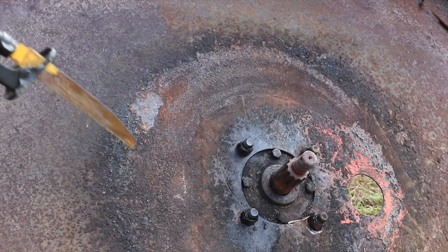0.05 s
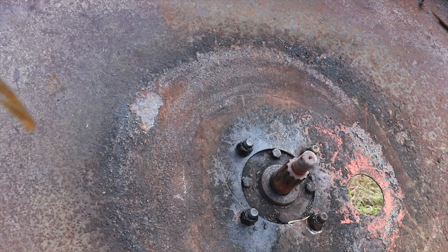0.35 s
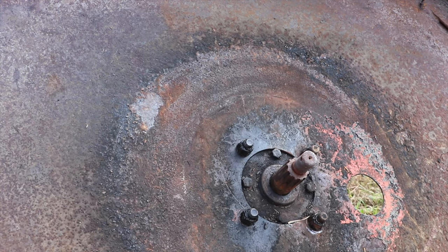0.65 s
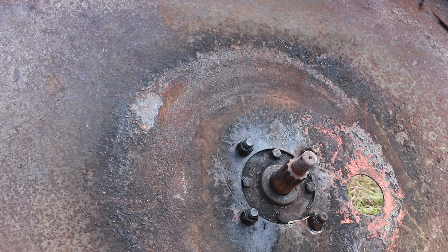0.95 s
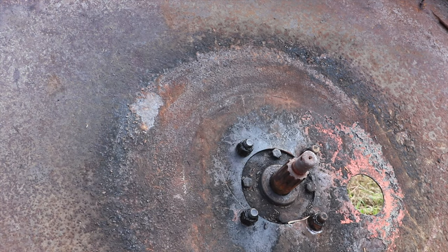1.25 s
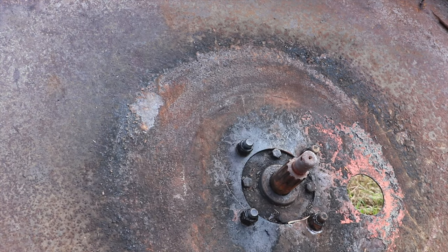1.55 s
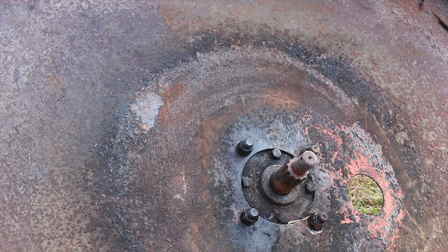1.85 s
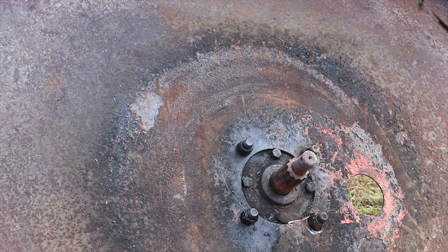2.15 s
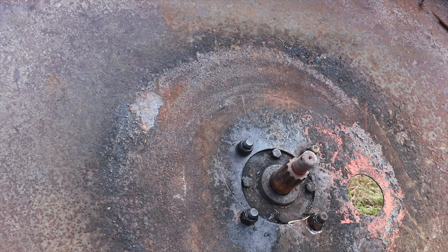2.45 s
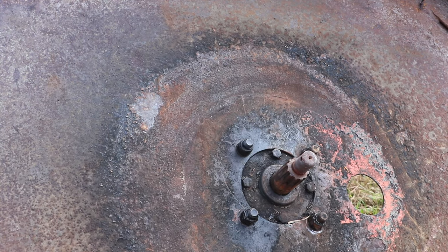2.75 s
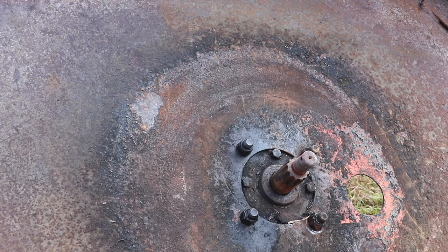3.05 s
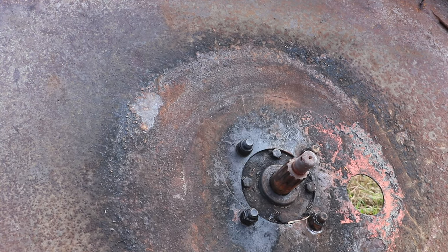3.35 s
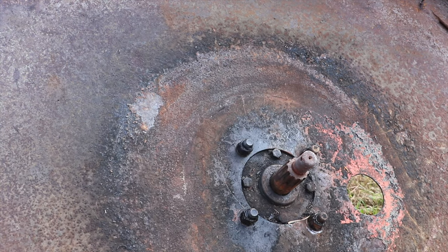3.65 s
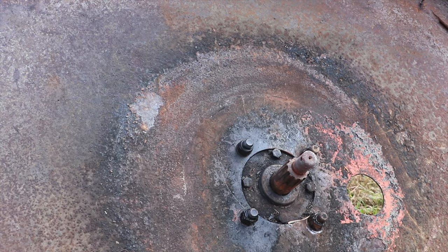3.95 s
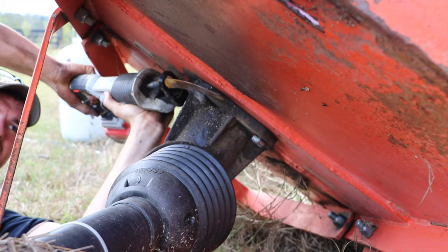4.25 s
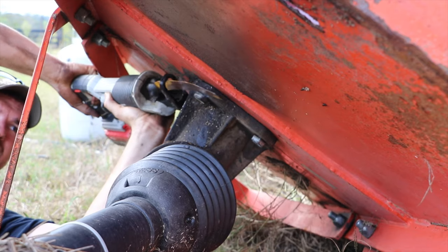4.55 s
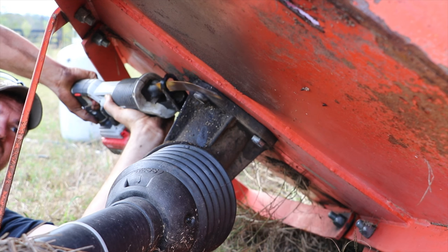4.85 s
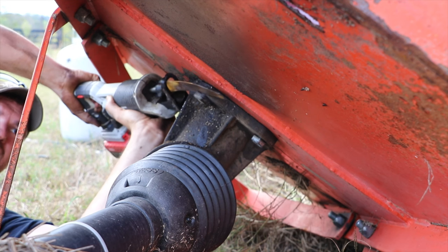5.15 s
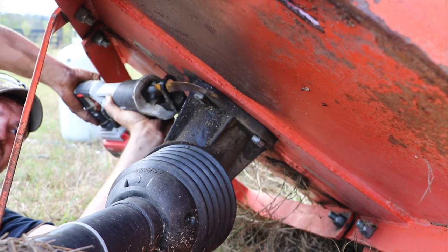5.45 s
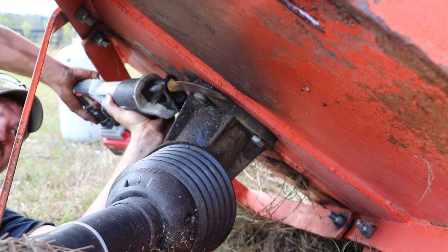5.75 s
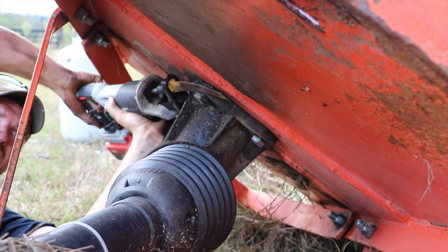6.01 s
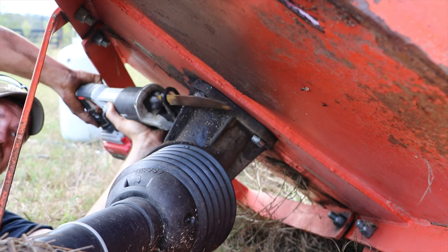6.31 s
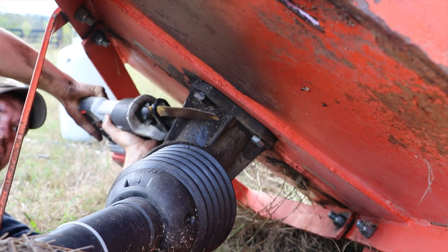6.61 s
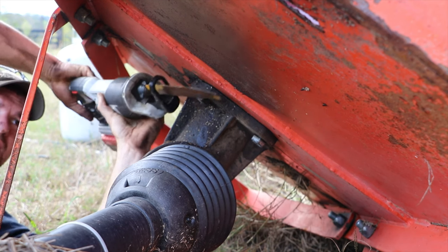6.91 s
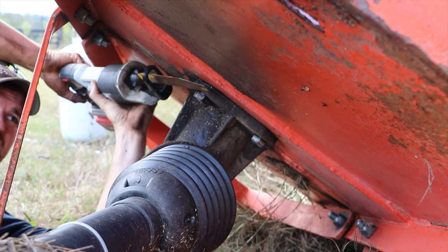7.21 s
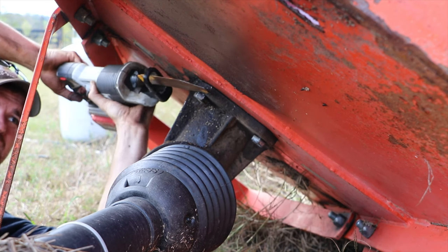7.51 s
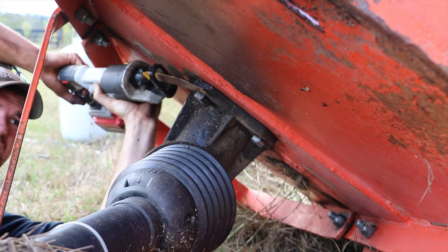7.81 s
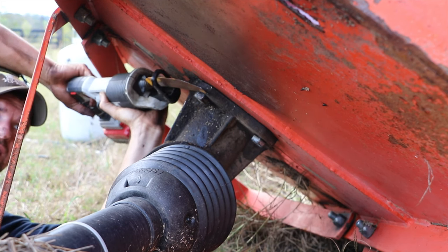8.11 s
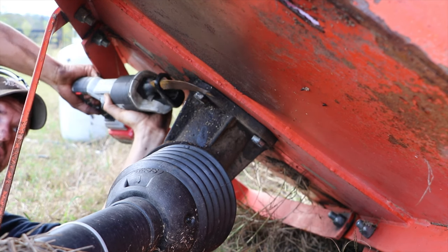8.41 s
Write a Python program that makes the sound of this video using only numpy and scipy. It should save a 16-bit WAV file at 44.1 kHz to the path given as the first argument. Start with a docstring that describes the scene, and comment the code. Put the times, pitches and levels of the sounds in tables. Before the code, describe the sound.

A reciprocating saw rasps loudly through bolts on ringing sheet steel outdoors, slips out, then restarts after a few clinks and bumps.

```python
"""A reciprocating saw cuts bolts on a rotary mower in a field. Over insects and a far bird, two knocks
set the steel blade disc ringing in its free modes. The teeth then chip at a bolt on the disc and next at
one on the sheet-steel deck, forcing each part to rasp and boom. The blade slips out and the deck hums
on; the recorder's gain on the background, ducked during the cuts, recovers and the insects are heard
again. The saw is set back with clinks and bumps, and bites again."""
import sys
import numpy as np
from scipy import signal
from scipy.fft import rfft, irfft
from scipy.io import wavfile

SR = 44100
rng = np.random.default_rng(int(sys.argv[2]) if len(sys.argv) > 2 else 0)


def unload_audio(sound):
    """Save the sound as a 16-bit wav file, at the path given as the first command line argument."""
    columns = np.transpose(np.atleast_2d(sound))
    # keep every value between -1 and 1, then stretch to whole-number steps
    steps = np.round(np.clip(columns, -1, 1) * 32767)
    wavfile.write(sys.argv[1], SR, steps.astype(np.int16))


N = 382347
TIME = np.arange(N) / SR
DISC_ON_S, DECK_ON_S, SLIP_S = 1.415, 4.08, 6.295
UNSEATED_DB = 5.5   # extra hiss while the blade is not seated in a groove

# crank speed, which sags as the saw is pressed harder: t/s, stroke rate/Hz
CRANK_SPEED = [(1.45, 30), (1.72, 30.2), (1.97, 32.9), (2.69, 34.6), (3.99, 34.1), (4.25, 35.4), (4.66, 33),
               (5.49, 31), (6.07, 30.5), (6.4, 27.2)]
# spectral envelope of the sawn deck: f/Hz, level/dB
DECK_SPECTRUM = [(55, -48), (85, -33), (120, -21.5), (300, -16), (700, -7.5), (1400, -6), (3000, -10),
                 (4700, -12), (6000, -18.5), (9300, -21), (10900, -30), (15500, -28.5)]
# resonances of the sawn deck: f/Hz, bandwidth/Hz, level/dB
DECK_RESONANCES = [(116.6, 9.7, -10), (170.4, 11, -10.5), (251, 18, 0), (348, 38, -7.5), (408, 16.7, 0.5),
                   (458.4, 12, -3.5), (627, 43, -9.5), (726.5, 20, 0), (798, 9.2, 2.5), (1120, 38, -12.5),
                   (1224, 180, -0.5), (1490, 7.7, -6), (1610, 150, -3), (1790, 117, -8), (2510, 50, -9),
                   (2520, 310, -6.5), (3540, 690, -11), (4050, 180, -8), (4700, 930, -11.5),
                   (7230, 720, -13), (8550, 550, -9.5), (8952, 9, -25), (10140, 110, -21),
                   (13500, 1000, -25)]


def from_db(db):
    """Amplitude ratio of a level in decibels."""
    return 10 ** (np.asarray(db) / 20)


def rms_one(x):
    """Normalisation to unit rms."""
    return x / np.sqrt(np.mean(x ** 2) + 1e-20)


def since(s):
    """Time elapsed since s; zero before it."""
    return np.maximum(TIME - s, 0)


def in_time(points):
    """Linear interpolation of a curve in time."""
    return np.interp(TIME, *np.transpose(points))


def at_hz(points, hz):
    """Interpolation on a log-frequency axis."""
    frequencies, values = np.transpose(points)
    return np.interp(np.log(hz), np.log(frequencies), values)


def swells(rows, t):
    """Sum of Gaussian pulses, one per row of t/s, length/s, height."""
    return sum(height * np.exp(-2 * ((t - s) / length) ** 2) for s, length, height in rows)


def drift(rate, size):
    """Random fluctuation of unit rms that takes rate new values a second."""
    steps = rng.standard_normal(N // 10)
    return rms_one(np.interp(TIME[:size] * rate, np.arange(len(steps)), steps))


def butter(hz, kind, order=2):
    """Maximally flat (Butterworth) filter sections."""
    return signal.butter(order, hz, kind, fs=SR, output="sos")


def add(out, s, sound):
    """Superposition of a sound from time s on."""
    at = round(s * SR)
    out[at:at + len(sound)] += sound[:max(N - at, 0)]


def body(x, spectrum, resonances=(), size=8192):
    """Source and filter: x excites a body whose resonances stand out of a broad spectral envelope."""
    hz = np.maximum(np.arange(size // 2 + 1) * SR / size, 1)
    power = from_db(at_hz(spectrum, hz)) ** 2
    for centre, width, db in resonances:
        detuning = 2 * (hz - centre) / width
        power += from_db(db) ** 2 / (1 + (np.sqrt(2) - 1) * detuning ** 2) ** 2
    cepstrum = irfft(np.log(power))[:size // 2]   # its causal half gives minimum phase
    cepstrum[0] /= 2
    response = irfft(np.exp(rfft(cepstrum, size)))
    return signal.fftconvolve(x, response)[:len(x)]


def field(air_db=-45.5, insect_db=-49, wing_hz=66, throb=0.34, attack_s=0.08):
    """Amplitude modulation: wing strokes make the insects' hiss throb over the noise of open air."""
    # spectral envelopes: f/Hz, level/dB
    air_spectrum = [(25, 4.5), (80, 11), (200, 9), (500, -2), (1500, -8.5), (4000, -13.5), (6000, -11),
                    (10000, -19), (15500, -5.5)]
    insect_spectrum = [(4000, -35), (6500, -9), (8000, -0.5), (9600, 2), (10500, -5), (15500, -22)]
    # the recorder's gain ducks the background after loud sounds, then recovers:
    # start/s, end/s, depth/dB, recovery/s
    gain_ducks = [(.73, 1.2, 2, .2), (1.421, 6.68, 32, .3), (7.75, 8.0, 2.5, .25)]
    air = rms_one(body(rng.standard_normal(N), air_spectrum))
    wings = 1 + throb * np.sin(2 * np.pi * wing_hz * TIME)
    insects = rms_one(wings * body(rng.standard_normal(N), insect_spectrum))
    duck_db = sum(depth * np.minimum(since(start) / attack_s, 1) * np.exp(-since(end) / recovery)
                  for start, end, depth, recovery in gain_ducks)
    return from_db(-duck_db) * (from_db(air_db) * air + from_db(insect_db) * insects)


def bird(scatter=0.82, scatter_t60=0.49):
    """Random frequency modulation makes short glides hoarse; scattering by far trees smears them."""
    # t/s, length/s, start f/Hz, end f/Hz, rms deviation/Hz, level/dB
    notes = [(0, 0.045, 2760, 2760, 60, -54), (0.012, 0.07, 3130, 3430, 250, -48.5),
             (0.088, 0.042, 2760, 2880, 150, -48), (0.137, 0.069, 3730, 3570, 70, -44.5),
             (0.17, 0.074, 4030, 5020, 900, -47), (0.273, 0.065, 2780, 2750, 60, -52.5),
             (0.317, 0.08, 3270, 3370, 250, -48), (0.459, 0.074, 3660, 3600, 410, -43.5),
             (1.05, .03, 4380, 4200, 60, -57), (1.1, .035, 4420, 4200, 60, -53),
             (1.15, 0.034, 4400, 4170, 59.5, -54.5), (1.18, 0.025, 4900, 5200, 400, -51)]
    song = np.zeros(N)
    for s, length, start_hz, end_hz, hoarse_hz, db in notes:
        size = round(length * SR)
        hz = np.linspace(start_hz, end_hz, size) + hoarse_hz * drift(1500, size)
        add(song, s, from_db(db) * np.hanning(size) * np.sin(2 * np.pi * np.cumsum(hz) / SR))
    trees = rng.standard_normal(SR // 2) * from_db(-60 * TIME[:SR // 2] / scatter_t60)
    return song + scatter * signal.fftconvolve(song, trees / np.linalg.norm(trees))[:N]


def deck_hum(level_db=-41.5, fade_db_per_s=15.5, swell_s=0.1):
    """Free decay: the deck's lowest resonances go on sounding after the blade slips out."""
    # f/Hz, bandwidth/Hz, level/dB
    resonances = [(109.4, 15, -14), (164.6, 5.4, -3), (276, 57, -25.5), (385, 41, -28)]
    hum = rms_one(body(rng.standard_normal(N), [(100, -39), (1000, -55), (10000, -72)], resonances))
    swell = np.minimum(since(SLIP_S - swell_s) / swell_s, 1)
    return swell * from_db(level_db - fade_db_per_s * since(SLIP_S)) * hum


def friction(rubs, spectrum, resonances=(), grit_db=0, clicks_per_s=4000):
    """Stick-slip friction: brief swells of tiny random clicks."""
    clicks = (rng.random(N) < clicks_per_s / SR) * rng.standard_normal(N)
    clicks *= from_db(grit_db * rng.standard_normal(N))
    envelope = swells([(s, length, from_db(db)) for s, length, db in rubs], TIME)
    return envelope * rms_one(body(clicks, spectrum, resonances))


def grass():
    """Stick-slip in dry grass gives high crackles."""
    # t/s, length/s, level/dB
    crackles = [(.268, 0.021, -39), (.535, 0.018, -37.5), (1.086, 0.007, -35)]
    # f/Hz, level/dB
    spectrum = [(2000, -30), (6000, -13), (9000, 0), (15500, -6)]
    return friction(crackles, spectrum)


def scuffs():
    """Sliding friction excites resonances as the idle blade scuffs over the steel."""
    # t/s, length/s, level/dB
    rubs = [(.615, 0.028, -43), (.706, 0.029, -51), (7.631, 0.0066, -36.5), (7.66, 0.07, -42),
            (7.99, 0.02, -42.5), (8.19, 0.029, -45), (8.256, 0.006, -29), (8.275, 0.061, -35.5)]
    # f/Hz, level/dB
    spectrum = [(200, 6.5), (800, 1), (1300, 3.5), (2200, -3.5), (4500, -18), (9000, -28), (15500, -37)]
    # f/Hz, bandwidth/Hz, level/dB
    resonances = [(1310, 61, 8), (2530, 120, -2), (4500, 200, -7.5)]
    return friction(rubs, spectrum, resonances, grit_db=-1.5)


def steel_wash():
    """High modal density: struck sheet steel rings as a second of noise whose highs die first."""
    # f/Hz, T60/s
    decay = [(100, 1), (350, 0.73), (800, 0.38), (2000, 0.17), (5000, 0.061), (14000, 0.057)]
    edges = np.geomspace(50, 17000, num=10)
    wash = np.zeros(SR)
    for low, high in zip(edges, edges[1:]):
        band = signal.sosfilt(butter([low, high], "band"), rng.standard_normal(SR))
        wash += band * from_db(-60 * TIME[:SR] / at_hz(decay, np.sqrt(low * high)))
    return wash


def impacts(blows, spectrum, modes, grip_db_per_s):
    """Impulse response: a crash damped by the grip, and free modes; a soft contact is a low-pass."""
    out, t = np.zeros(N), TIME[:SR * 2]
    ringing = sum((-1) ** k * from_db(db - 60 * t / t60) * np.sin(2 * np.pi * hz * t)
                  for k, (hz, db, t60) in enumerate(modes))
    for s, crash_db, contact_hz, ring_db in blows:
        contact = butter(contact_hz, "low")
        damped = steel_wash() * from_db(-grip_db_per_s * t[:SR])
        crash = signal.sosfilt(contact, body(damped, spectrum))
        add(out, s, from_db(crash_db) * crash / np.std(crash[:SR // 100]))
        add(out, s, from_db(ring_db) * signal.sosfilt(contact, ringing))
    return out


def disc_knocks():
    """Free vibration: the lightly damped disc rings on after each knock."""
    # t/s, crash level/dB, contact cut-off/Hz, ring gain/dB
    blows = [(.415, -19.5, 870, -33.5), (.447, -28.5, 1000, -43), (.727, -14.5, 5900, -21.5),
             (.752, -18, 6100, -21.5), (.82, -47, 9000, -68.5)]
    # crash: f/Hz, level/dB
    spectrum = [(50, -62), (110, -22.5), (200, -2.5), (500, -7), (1500, -2.5), (3000, -5.5), (5000, -3),
                (8000, -5), (15500, 2)]
    # f/Hz, level/dB, T60/s
    modes = [(115, -25, 2.7), (167, -18, 3.4), (198, -26, 0.79), (262, 1, 1.02), (260, -8.5, 1.1),
             (377.7, -3, 1.25), (420, -11, .4), (459.6, -2, 1.1), (540, -0.5, 0.28), (620, -18, 0.41),
             (751, 4.5, 0.14), (823, -9, 0.57), (1003, -10.5, .34), (1130, -12, .2), (1340, -4, 0.5),
             (1430, -15, 0.47), (1577, 6, 0.31), (2104, 0.5, .14), (2880, 11.5, 0.027), (4030, 2, 0.08),
             (5280, -4, 0.13), (8440, 2, .1), (11940, -13, .35), (13250, 0.5, 0.2)]
    return impacts(blows, spectrum, modes, grip_db_per_s=27)


def deck_bumps():
    """Bumps excite the deck's free modes; the ringing is faded out as the saw restarts."""
    # t/s, crash level/dB, contact cut-off/Hz, ring gain/dB
    blows = [(7.162, -32, 1220, -31), (7.2, -36, 5000, -62), (7.234, -39, 5000, -56),
             (7.251, -27.5, 4060, -24), (7.752, -18, 2820, -26), (7.79, -27, 4820, -48),
             (8.354, -25, 9000, -36)]
    # crash: f/Hz, level/dB
    spectrum = [(50, -12), (90, -11), (140, -2), (400, -2.5), (580, -8), (850, -6), (1100, -7),
                (1400, -4.5), (2000, -5.5), (4500, -9.5), (8000, -3), (15500, -1)]
    # f/Hz, level/dB, T60/s
    modes = [(116, -0.5, 2.15), (138, 0, 1.3), (154.6, -5, 0.77), (175.3, -1, 1.7), (244, -12, 2.1),
             (316.5, -16.5, 1.66), (355, -6.5, 1.2), (388, -5.5, 0.82), (451, -13, 0.98), (522, -37, 0.45),
             (630, -26, 0.29), (743, -15, 0.35), (820, -4, 0.038), (1200, -7, 0.2), (1390, 2.5, 0.033),
             (1590, -33, 1.2), (1760, -14, 0.17), (4490, -11, 0.11)]
    fade_out = np.interp(TIME, [8.36, 8.44], [1, 0])
    return impacts(blows, spectrum, modes, grip_db_per_s=20) * fade_out


def blade_clinks(ring_db=-12):
    """Heavy damping: the saw blade's high modes ring only briefly when it taps the steel."""
    # t/s, crash level/dB, contact cut-off/Hz
    taps = [(6.563, -54, 15000), (6.59, -45, 8800), (6.685, -58, 7000), (6.742, -63, 5000),
            (6.95, -28.5, 15000), (6.98, -25.5, 7668), (7.055, -47, 5000), (7.072, -43, 5000),
            (7.142, -36.5, 2504), (7.25, -42, 9000), (7.75, -19.5, 2000), (7.767, -27, 14920),
            (8.333, -30.5, 6970), (8.354, -12, 5100)]
    # crash: f/Hz, level/dB
    spectrum = [(100, -17), (550, -9), (850, -6), (1050, -6), (1350, 2), (1800, -2), (2800, 3),
                (4500, -4.5), (8500, 0.5), (11000, -9), (15500, -4)]
    # f/Hz, level/dB, T60/s
    modes = [(1060, -17, 0.17), (1370, -5, 0.09), (2310, -11, 0.2), (2520, -3, 0.17), (3360, -18, .05),
             (4400, -8, 0.16), (5717, -22, .11), (8780, -16, .07), (12000, -10, .17), (13200, -18, 0.11)]
    blows = [(s, db, contact_hz, db + ring_db) for s, db, contact_hz in taps]
    return impacts(blows, spectrum, modes, grip_db_per_s=660)


def snags(gain_db=-11, t60=0.054, small_per_s=4, small_db=-24, spread_db=7.5):
    """Sudden release: a caught tooth lets go with a bright crack; small catches are a Poisson process."""
    # hard catches, mostly on the way into and out of the groove: t/s, relative level/dB
    hard = [(1.417, -13.5), (1.4397, -8), (1.47, -11), (1.527, -7.5), (1.547, -9.5), (1.6367, -9),
            (2.9153, -14.5), (3.71, -7.5), (6.116, -8), (6.1784, -6), (6.223, -4.5), (6.2644, -9)]
    # f/Hz, level/dB
    spectrum = [(500, -25), (2000, -9), (4500, 18.5), (9000, 17), (11000, 7.5), (15500, 5.5)]
    out, t = np.zeros(N), TIME[:SR // 10]
    waits, sizes = rng.random((60, 2)).T
    times = DISC_ON_S + np.cumsum(-np.log(waits)) / small_per_s
    small = [(s, small_db + spread_db * (2 * size - 1)) for s, size in zip(times, sizes) if s < SLIP_S]
    for s, db in list(hard) + small:
        crack = rms_one(body(rng.standard_normal(len(t)), spectrum))
        add(out, s, from_db(db + gain_db - 60 * t / t60) * crack)
    return out


def rattle(x, depth_db=1, rate_hz=25):
    """Independent modulation of bands: each range of the steel's overtones flares up on its own."""
    out = 0
    for hz in (1000, 2000, 4000):
        band = signal.sosfiltfilt(butter(hz, "low"), x)
        out = out + band * from_db(depth_db * drift(rate_hz, len(x)))
        x = x - band
    return out + x


def cut(start, end, stroke_hz, spectrum, resonances, rasp_db, boom_db, hiss_db,
        return_db, turn_db, chatter_db, uneven_db, wash_db, overtone_db=-5.5):
    """Forced vibration: teeth chip the bolt twice per crank turn, hardest at mid-stroke."""
    span = slice(round(start * SR), round(end * SR))
    t = TIME[span]
    stroke_hz, rasp_db, boom_db, hiss_db = [
        np.broadcast_to(v, N)[span] for v in (stroke_hz, rasp_db, boom_db, hiss_db)]
    turns = np.cumsum(stroke_hz) / SR
    velocity = np.sin(2 * np.pi * turns)
    cycle_db = turn_db * (1 - np.abs(velocity)) + return_db * (velocity < 0)
    stroke_db = uneven_db * rng.standard_normal(400)[(2 * turns).astype(int)]
    force = from_db(cycle_db + stroke_db + chatter_db * drift(700, len(t)))
    chips = rms_one(force * (rng.random(len(t)) < 16000 / SR) * rng.choice([-1, 1], len(t)))
    # the steel stores each bite and gives it back as a short wash and dense narrow overtones
    energy = signal.lfilter([1], [1, -np.exp(-1 / (0.017 * SR))], force ** 2)
    wash = rms_one(np.sqrt(energy) * rng.standard_normal(len(t)))
    high_modes = signal.sosfilt(butter(1500, "high"), steel_wash())
    overtones = rms_one(signal.fftconvolve(chips, high_modes)[:len(t)])
    bite = chips + from_db(overtone_db) * overtones
    shaken = body(bite + from_db(wash_db) * wash, spectrum, resonances)
    low, high = butter(500, "low", order=4), butter(6000, "high", order=4)
    boom = signal.sosfiltfilt(low, shaken)
    rasp = rattle(shaken - boom - signal.sosfiltfilt(high, shaken))
    hiss = signal.sosfiltfilt(high, body(bite, spectrum, resonances))   # straight from the teeth
    sawing = rms_one(rasp) + from_db(hiss_db) * rms_one(hiss) + from_db(boom_db) * rms_one(boom)
    # the blade binds for a moment and the whole cut surges: t/s, length/s, rise/dB
    binds = [(2.71, 0.048, 2), (3.05, 0.058, 2.5), (3.275, 0.0098, 0.5), (3.52, 0.063, 3), (3.93, 0.074, 2),
             (8.39, 0.045, 3)]
    hand_db = 0.4 * drift(8.99, len(t))   # the hand's pressure wanders
    out = np.zeros(N)
    add(out, start, from_db(rasp_db + swells(binds, t) + hand_db) * sawing)
    return out


def disc_cut(seating_s=0.16):
    """Resonance: the blade skips brightly, seats itself and drives the disc into a boom."""
    # f/Hz, level/dB
    spectrum = [(55, -54), (92, -35.5), (125, -28.5), (300, -15.5), (650, -20.5), (1300, -11), (2200, -17),
                (4500, -22), (6500, -33), (9300, -39), (10700, -47.5), (15500, -55.5)]
    # f/Hz, bandwidth/Hz, level/dB
    resonances = [(117, 8.1, -17), (156, 9.9, -15.5), (243.8, 20, -6), (272.1, 11.5, 0), (398.5, 27, -7.5),
                  (438, 34, -22), (483, 31, -10), (597, 75, -12), (762.4, 57, -3.5), (863, 45, -0.5),
                  (1073, 69, -8), (1280, 130, -20), (1441, 27, -6.5), (1778, 110, -12.5), (2620, 110, -15),
                  (3077, 7.8, -12.5), (3790, 30, -11), (4130, 63, -30), (4340, 37, -16.5),
                  (5100, 90, -37.5), (6720, 120, -29), (8770, 770, -34)]
    # t/s, level/dB re the rasp
    boom = [(1.42, -5.5), (1.8, -0.5), (2.15, -3.5), (2.85, -4.5), (3.2, -8), (3.55, -6), (4.05, -7)]
    hiss_db = -18 + UNSEATED_DB * np.exp(-since(DISC_ON_S) / seating_s)
    return cut(DISC_ON_S, DECK_ON_S, in_time(CRANK_SPEED), spectrum, resonances,
               rasp_db=-19, boom_db=in_time(boom), hiss_db=hiss_db,
               return_db=-4, turn_db=-4, chatter_db=1.6, uneven_db=1.34, wash_db=-1)


def deck_cut(climb_out_s=0.14):
    """Steady forcing of the deck, brighter at the end as the blade climbs out of its groove."""
    # t/s, level/dB re the rasp
    boom = [(4.1, -7.5), (4.5, -12.5), (4.95, -17), (5.25, -11), (5.7, -10.5), (6.28, -12.5)]
    hiss_db = -8.5 + UNSEATED_DB * np.exp(-np.abs(TIME - SLIP_S) / climb_out_s)
    return cut(DECK_ON_S, SLIP_S, in_time(CRANK_SPEED), DECK_SPECTRUM, DECK_RESONANCES,
               rasp_db=-19.5, boom_db=in_time(boom), hiss_db=hiss_db,
               return_db=-4.5, turn_db=-8.5, chatter_db=1.67, uneven_db=1.17, wash_db=-1.5)


def slip(free_s=6.48, stop_s=6.74):
    """Loss of contact: the blade skates ever more lightly with a thin hiss, comes free and coasts."""
    # f/Hz, level/dB
    spectrum = [(55, -30), (110, -31), (300, -10), (1000, -7), (2500, -10), (4000, -12.5), (5700, -13),
                (8000, -11), (11000, -28), (15500, -30)]
    # f/Hz, bandwidth/Hz, level/dB
    resonances = [(155, 20, -11), (394, 44, 2), (1249.3, 120, -2.5), (3540, 366, -12), (7203, 429, -9),
                  (8800, 665, -3), (10103, 210, -4.5), (11800, 494, -13), (13500, 780, -11),
                  (14800, 1200, -17)]
    contact_db = -450 * since(free_s)
    skate_db = -26 - 37 * since(SLIP_S) + contact_db
    coast_db = -47.5 - 98 * since(free_s)
    hiss_db = np.interp(from_db(contact_db), [0, 1], [-18, 0.5])
    return cut(SLIP_S, stop_s, in_time(CRANK_SPEED), spectrum, resonances,
               rasp_db=np.maximum(skate_db, coast_db), boom_db=-14.5, hiss_db=hiss_db,
               return_db=-2.5, turn_db=-5, chatter_db=3, uneven_db=0, wash_db=0, overtone_db=-5)


def restart(start_s=8.364, end_s=8.67, stroke_hz=38.07):
    """Forcing resumes at full speed; pressed harder, the deck loses its three lowest resonances."""
    return cut(start_s, end_s, stroke_hz, DECK_SPECTRUM, DECK_RESONANCES[3:],
               rasp_db=-18.5, boom_db=-13, hiss_db=-6,
               return_db=-7.5, turn_db=-3, chatter_db=2.7, uneven_db=1.5, wash_db=1.5)


def scene():
    """Superposition of handling, saw and field at one listening point."""
    handling = disc_knocks() + deck_bumps() + blade_clinks() + scuffs() + grass()
    saw = disc_cut() + deck_cut() + slip() + restart() + snags()
    return (handling + saw + deck_hum() + field() + bird())[None]


def record(dry, bass_hz=57, top_hz=15900):
    """Band limiting and saturation: the deepest bass is lost, the highest peaks clip, the top is cut."""
    thin = signal.sosfilt(butter(bass_hz, "high", order=1), dry)
    top_cut = signal.ellip(12, .1, 80, top_hz, fs=SR, output="sos")
    return signal.sosfilt(top_cut, np.clip(thin, -1, 1))


dry = scene()
out = record(dry)
unload_audio(out)
```